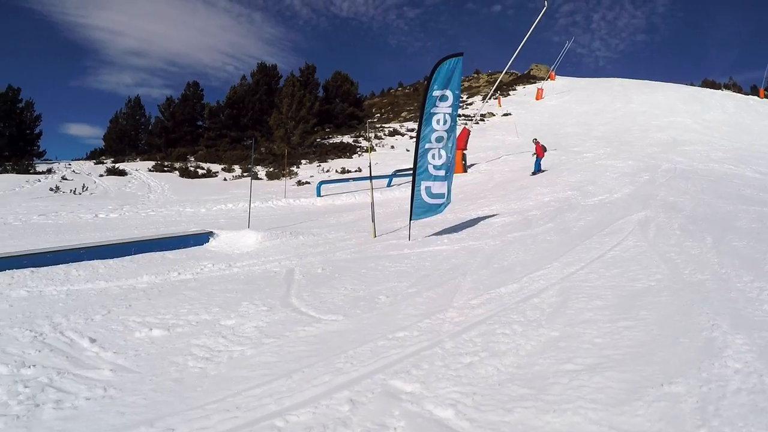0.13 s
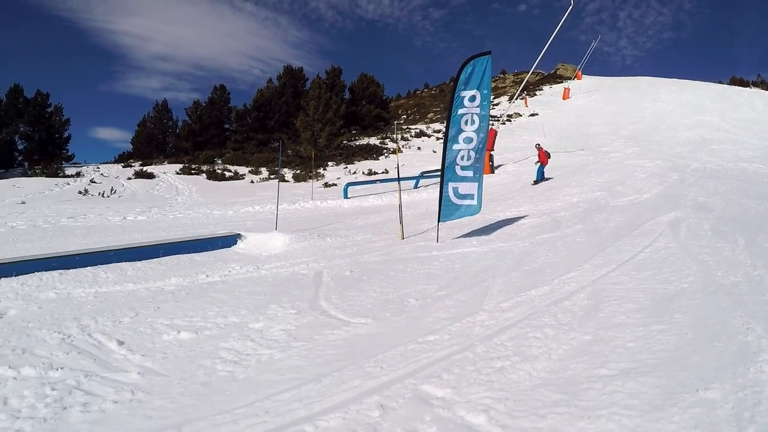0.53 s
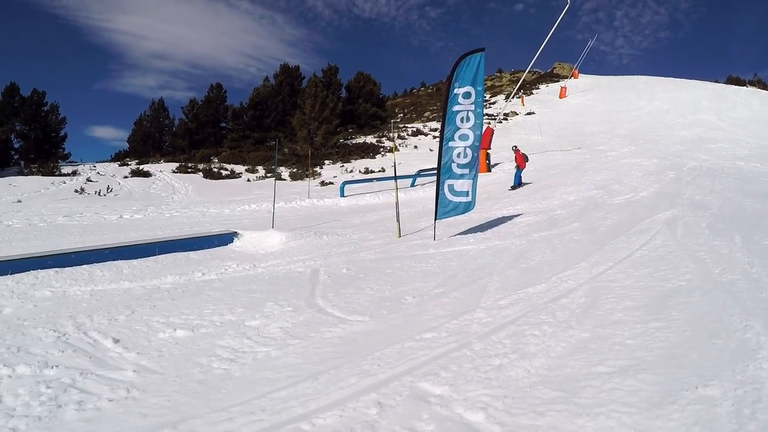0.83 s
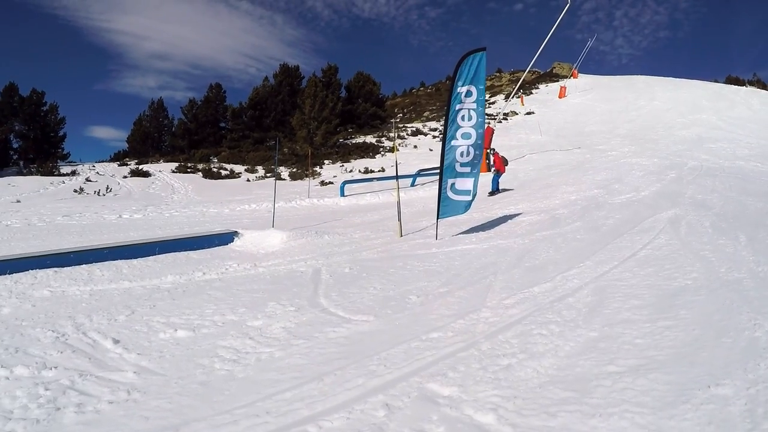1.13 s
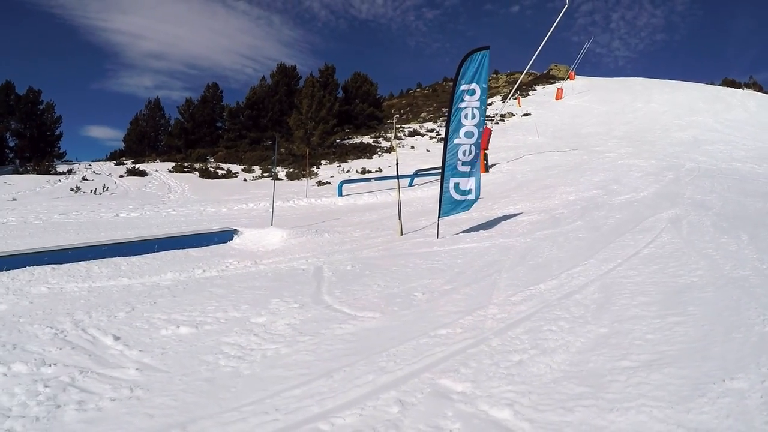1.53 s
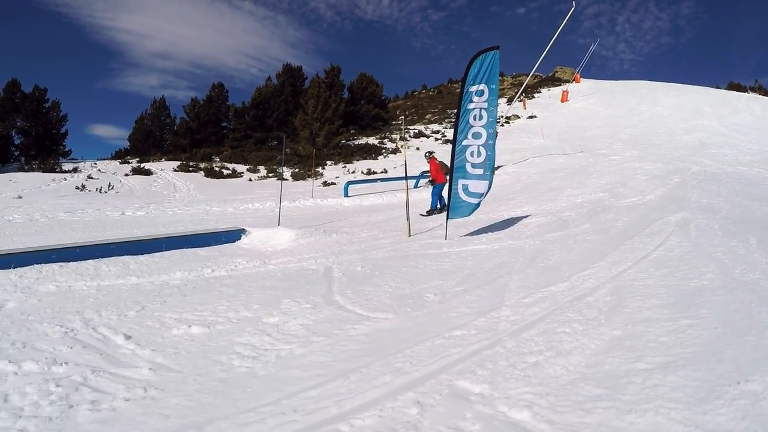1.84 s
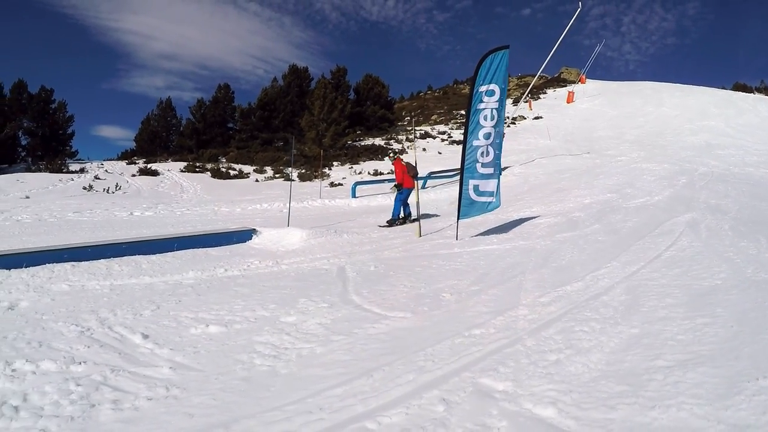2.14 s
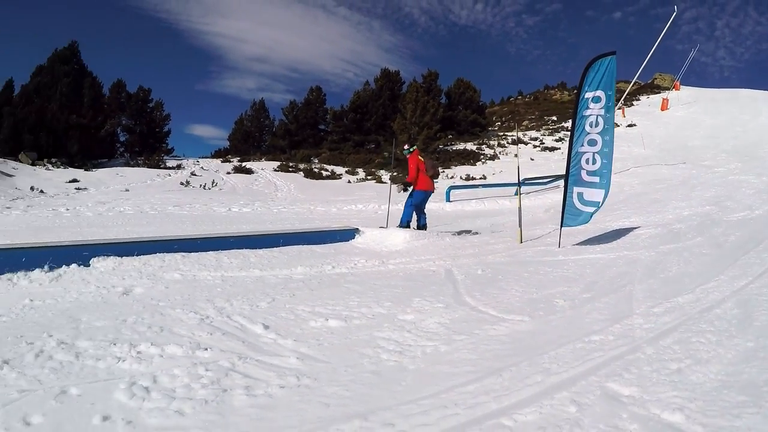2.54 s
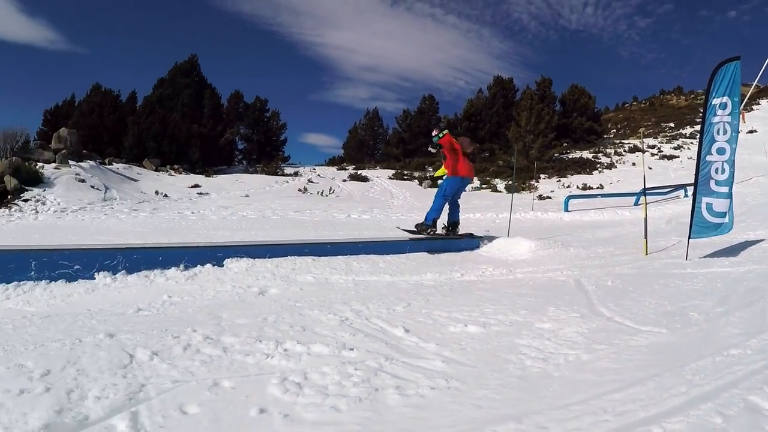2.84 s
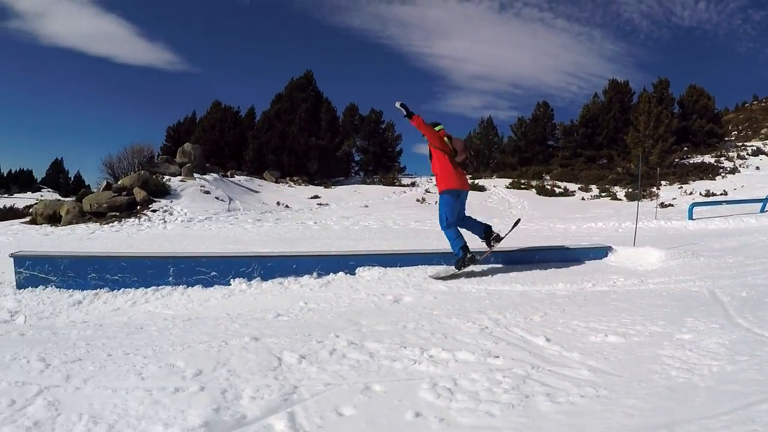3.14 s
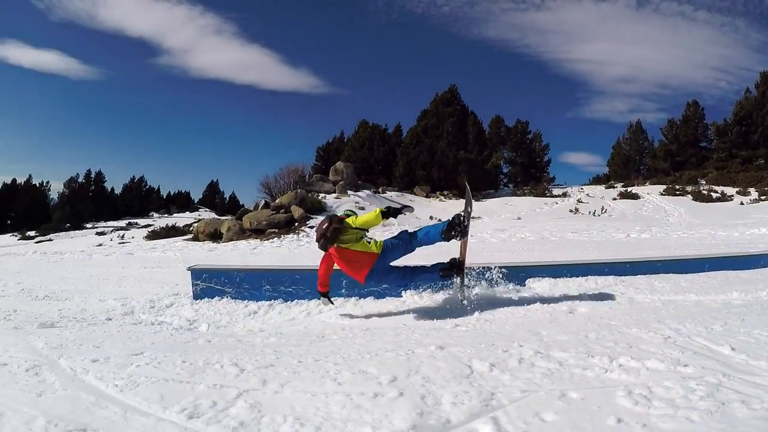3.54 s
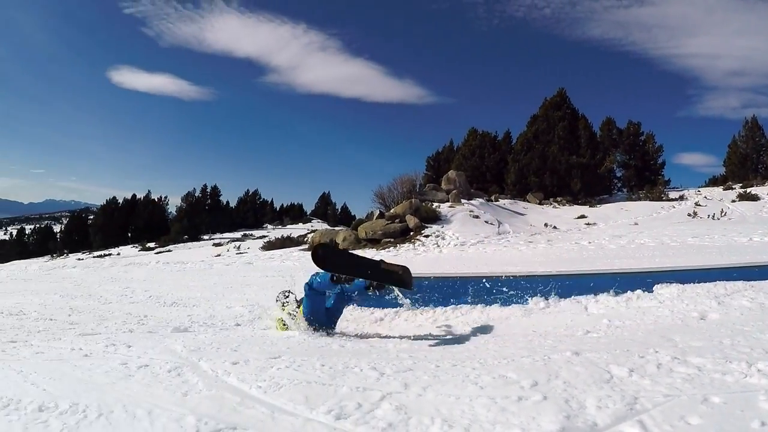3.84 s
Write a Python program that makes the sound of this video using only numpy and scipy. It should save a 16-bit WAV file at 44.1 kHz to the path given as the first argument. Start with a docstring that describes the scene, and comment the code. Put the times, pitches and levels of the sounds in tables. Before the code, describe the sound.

A snowboard glides almost inaudibly under gusty wind rumble, clatters onto a hollow box with one hard slap, scrapes briefly, then skids through snow as the rider thumps down; open slope, wind hitting the microphone.

```python
"""Snowboard on a box in the wind

Wind rumbles and buffets a microphone: slowly modulated bands of noise, and single swings of pressure for the eddies.
A board carves over snow (granular friction noise), strikes a box with a clatter and a hard slap (noise bursts and
decaying modes), and slides along it (friction driving those modes). Its edge then skids through the snow, throws
powder, and the rider falls with dull thumps (noise bursts). Both channels are equal and no walls answer."""
import sys
import numpy as np
from scipy import signal
from scipy.fft import rfft, irfft, next_fast_len
from scipy.io import wavfile
from scipy.ndimage import uniform_filter1d, map_coordinates

SR = 44100
rng = np.random.default_rng(int(sys.argv[2]) if len(sys.argv) > 2 else 0)


def unload_audio(sound):
    """Save the sound as a 16-bit wav file, at the path given as the first command line argument."""
    columns = np.transpose(np.atleast_2d(sound))
    # keep every value between -1 and 1, then stretch to whole-number steps
    steps = np.round(np.clip(columns, -1, 1) * 32767)
    wavfile.write(sys.argv[1], SR, steps.astype(np.int16))


N = 176400

# Levels are before the trims below; spectra are relative, since coloured noise is brought to rms 1.
# Wind strength, from the slow rumble to the fast flutter of gusts: (time [s], level [dB])
RUMBLE_LEVEL = [(0.06, -38), (0.17, -14), (0.2, -21.5), (0.38, -19.5), (0.42, -28), (0.65, -35.5),
                (0.89, -29.5), (1.27, -27.5), (1.49, -15.5), (1.5, -20.5), (1.84, -30.5), (1.87, -12.5),
                (1.94, -28), (1.97, -13), (2.0, -36), (2.02, -19.5), (2.23, -19.5), (2.26, -28),
                (2.5, -14.5), (2.73, -24.5), (2.8, -9.5), (2.88, -34), (2.98, -17), (3.09, -23),
                (3.13, -16), (3.2, -23), (3.27, -13.5), (3.31, -22), (3.57, -19.5), (3.59, -28),
                (3.78, -18.5), (4.0, -26)]
ROAR_LEVEL = [(0.06, -47.5), (0.14, -46), (0.18, -15), (0.27, -38), (0.67, -59), (1.34, -39.5),
              (1.38, -27.5), (1.74, -40.5), (1.96, -23.5), (1.99, -34), (2.08, -26), (2.12, -26),
              (2.16, -23.5), (2.26, -30.5), (2.56, -31), (2.65, -11), (2.67, -17), (2.81, -22),
              (2.87, -29.5), (3.06, -19.5), (3.14, -28.5), (3.25, -25.5), (3.31, -15.5), (3.37, -20),
              (3.41, -16.5), (3.54, -23.5), (3.76, -25.5), (3.78, -18.5), (3.99, -36), (4.0, -28)]
FLUTTER_LEVEL = [(0.06, -41.5), (0.14, -73), (0.18, -25), (0.25, -44), (0.67, -72.5), (1.34, -51.5),
                 (1.38, -33), (1.46, -59), (1.51, -47), (1.53, -51.5), (1.74, -49), (1.88, -41),
                 (2.06, -47), (2.12, -33.5), (2.14, -33), (2.18, -30.5), (2.29, -47.5), (2.39, -35),
                 (2.41, -58), (2.51, -22), (2.53, -37.5), (2.66, -29.5), (2.69, -29), (2.74, -18),
                 (2.76, -29.5), (2.86, -36.5), (2.87, -33.5), (2.97, -35), (3.0, -19), (3.03, -35),
                 (3.08, -32), (3.12, -24), (3.14, -26), (3.15, -32), (3.24, -31.5), (3.35, -24),
                 (3.44, -31.5), (3.56, -30), (3.59, -42), (3.68, -30.5), (3.71, -46.5), (3.78, -25),
                 (3.94, -43), (4.0, -46)]
# Wind and open-air spectra: (frequency [Hz], density [dB per Hz])
RUMBLE_TONE = [(10, -14.5), (22, 2), (38, 2), (65, -1.5), (95, -10), (140, -22), (220, -29.5), (500, -80.5),
               (1000, -120)]
ROAR_TONE = [(40, -25.5), (85, -2), (120, 2), (160, -3), (210, -12), (300, -25.5), (500, -66), (1000, -105)]
FLUTTER_TONE = [(110, -7.5), (190, 1), (260, 1), (340, -3), (450, -12), (700, -27), (1200, -42.5),
                (2500, -94)]
AIR_TONE = [(100, -6.5), (350, -5), (520, 5), (900, -3.5), (1500, -7.5), (3000, -8.5), (4600, -12.5),
            (5600, -13.5), (9000, -21), (15000, -27.5)]
# Board gliding on snow: (time [s], level [dB])
CARVE_LEVEL = [(0.08, -71), (0.27, -65), (0.48, -63), (0.5, -92), (0.63, -81.5), (0.67, -64), (1.1, -84),
               (1.4, -59), (1.71, -64), (1.92, -58), (2.29, -58.5), (2.35, -52), (2.63, -54), (2.67, -49),
               (2.77, -56), (2.8, -81), (2.82, -56), (2.85, -65)]
# Edge biting into the snow in a turn: (time [s], level [dB], rise [s], fall [s])
TURNS = [(.47, -62.5, 0.16, .012), (1.41, -55, 0.092, 0.056)]
# Spectra of glide and turn: (frequency [Hz], density [dB per Hz])
CARVE_TONE = [(300, -22.5), (800, 0.5), (1500, -3.5), (2500, 0), (4000, 0), (5500, -11), (8000, -14.5),
              (11000, -19), (15000, -20)]
TURN_TONE = [(400, -19), (1000, 4.5), (1600, 0), (2300, 5), (3200, -1), (5000, -15), (9000, -46)]
# Eddies that hit the microphone: (time [s], level [dB], frequency [Hz])
EDDIES = [(.173, -15.5, 313), (.185, -10, 195), (0.198, -17, 230), (.361, -24.5, 154), (0.469, -32, 210),
          (1.384, -17, 224), (1.504, -12.5, 158), (1.874, -19, 80), (1.905, -25, 322), (1.947, -24.5, 347),
          (2.085, -14.5, 170), (2.118, -9, 287), (2.122, 0, 116), (2.171, -23.5, 346), (2.498, -17, 510),
          (2.649, -11, 166), (2.661, -19.5, 490), (2.736, -19.5, 298), (2.806, -16, 420), (2.81, -4.5, 55),
          (3.11, -16, 170), (3.1161, -10, 670), (3.119, -2.5, 233), (3.126, -2.5, 134), (3.160, -4, 245),
          (3.193, -15, 224), (3.217, -9.5, 127), (3.271, -10.5, 129), (3.298, -6.5, 152), (3.331, -15, 403),
          (3.343, -6.5, 185), (3.375, -16.5, 510), (3.416, -6, 99), (3.489, -11.5, 122)]
# Board sliding on the box: (time [s], level [dB])
SLIDE_LEVEL = [(2.865, -60), (2.874, -40), (2.905, -41), (2.915, -39), (2.945, -35), (2.985, -43.5),
               (3.01, -33.5), (3.03, -37.5), (3.06, -31.5), (3.095, -40), (3.12, -29.5), (3.145, -64)]
# Spectrum of the sliding friction: (frequency [Hz], density [dB per Hz])
SLIDE_TONE = [(200, 9), (500, 5.5), (1100, -1), (1500, 4), (2200, 2.5), (3300, 5.5), (4300, 0), (5300, -7),
              (7000, -10.5), (8500, -19), (15000, -35)]
# Modes of board and box: (frequency [Hz], level [dB], t60 [s])
RING_MODES = [(627, -17.5, .019), (932, -12, 0.029), (1856, -18.5, 0.03), (2000, -20, 0.033),
              (2170, -13, 0.021), (2420, -28, 0.019), (2643, -8.5, 0.023), (2849, -18, 0.017),
              (3380, 0.5, 0.015), (3770, -5.5, 0.019), (4010, -4.5, 0.017), (4230, -8, 0.021),
              (4590, -16, 0.029), (5550, -9, 0.0082), (5780, -19, 0.015), (6370, -17, 0.015),
              (8160, -24, 0.014), (8600, -21, 0.011), (9350, -22, .012), (10440, -31, 0.014)]
# Modes of the hollow body of the box: (frequency [Hz], level [dB], t60 [s])
BOOM_MODES = [(380, -3.5, 0.14), (445, -7, .06), (537, -6.5, .08), (605, -4, .04), (695, -9.5, .045),
              (810, -8.5, 0.066), (930, -4, 0.039), (1090, -6, 0.059), (1263, 0, 0.027)]
# Board striking the box:
# (time [s], snap [dB], crack [dB], ring [dB], boom [dB], crack t60 [s], rise of the ring [s])
KNOCKS = [(2.868, -32, -22, -26, -21.5, 0.038, 0.000088), (2.8869, -38, -23, -40, -23.5, 0.022, .0004),
          (2.901, -39, -29, -44, -32, .025, 0.00027), (2.9946, -3, -14, -0.5, -27, 0.03, 0.00006),
          (3.12, -34, -28, -12, -30, 0.026, 0.0013)]
# Spectra of snap and crack: (frequency [Hz], density [dB per Hz])
SNAP_TONE = [(500, 0), (1800, 2), (3000, -4), (4200, -2), (5000, -3), (6500, -2), (9000, -13), (12000, -27),
             (14500, -24)]
CRACK_TONE = [(300, -17), (900, -8), (1500, -5), (2500, 5), (3400, 3.5), (4400, -13), (5200, -6),
              (7000, -21), (10000, -24), (12500, -31), (14500, -42)]
# Edge and body ploughing the snow, and the thrown powder: (time [s], level [dB])
SKID_LEVEL = [(3.14, -45), (3.144, -47), (3.354, -39), (3.518, -43), (3.568, -35.5), (3.618, -49.5),
              (3.688, -46), (3.712, -53), (3.762, -46), (3.774, -35.5), (3.788, -40.5), (3.812, -33),
              (3.946, -52.5), (4.0, -42.5)]
POWDER_LEVEL = [(3.14, -56), (3.242, -49.5), (3.3, -52.5), (3.378, -46.5), (3.54, -47.5), (3.61, -63),
                (3.628, -52), (3.74, -58), (3.81, -46), (3.916, -60.5), (3.966, -59.5), (4.0, -47)]
# Spectra of skid and powder: (frequency [Hz], density [dB per Hz])
SKID_TONE = [(200, -7), (600, 2.5), (1200, 1), (2000, -1), (3300, 1), (4400, -2), (5400, -9), (8000, -20.5),
             (15000, -29)]
POWDER_TONE = [(2000, -8), (5000, 5.5), (7000, 5.5), (9000, 3.5), (11500, -4), (14000, -0.5), (16000, -9)]
# Rider thumping into the snow: (time [s], level [dB], t60 [s])
THUMPS = [(3.651, -30, 0.023), (3.683, -30, 0.026), (3.7733, -9, 0.024), (3.793, -22, 0.036),
          (3.812, -15, 0.036), (3.823, -21.5, 0.059), (3.861, -27, 0.038)]
# Spectra of thump, packing snow and icy crust: (frequency [Hz], density [dB per Hz])
THUMP_TONE = [(60, -11), (200, -1), (450, 1), (800, -1), (1400, -10), (3000, -26.5), (6000, -31),
              (12000, -50)]
CRUNCH_TONE = [(150, -6), (350, 0), (700, 2), (1300, -6), (1900, -20), (4000, -28), (9000, -42)]
CRUST_TONE = [(1500, -18), (3000, -8), (4200, 2), (5000, -1), (5900, -1), (7000, -12), (10000, -18),
              (15000, -26)]

# Level trims [dB]; AIR_DB is the whole level of the open-air hiss
AIR_DB, RUMBLE_DB, ROAR_DB, FLUTTER_DB = -58, 0.5, -1, -1
CARVE_DB, SLIDE_DB, SKID_DB, POWDER_DB = 1, -0.5, 1, 1
WHINE_HZ, WHINE_WOBBLE_HZ, WHINE_DB = 5000, 5, -77.5
EDDY_CYCLES = 0.46  # width of an eddy, in periods of its swing
EDDY_SPREAD = 2.54  # frequency of its small partner over its own
SLIDE_RING_DB = -7  # ring in the slide, relative to the bare friction
SNAP_T60_S = 0.0029
# Deepest push into the snow: after the end, so only a vanishing trace of its build-up falls inside
CRUNCH_S = 4.2
CRUNCH_DB, CRUNCH_RISE_S, CRUNCH_FALL_S = -25.5, 0.024, 0.014
CRUST_DB, CRUST_RISE_S, CRUST_FALL_S = -38, 0.035, 0.045
START_S = 0.055  # silence before this
TOP_HZ = 15350  # band limit


def amp(db):
    """Decibel law: 20 dB is a factor of ten in amplitude."""
    return 10 ** (np.asarray(db) / 20)


def unit(x):
    """Normalisation by mean power: x at rms 1."""
    return x / np.sqrt(np.mean(x ** 2) + 1e-20)


def clock():
    """Uniform sampling: the time [s] of every sample."""
    return np.arange(N) / SR


def level(rows, fade_s=0.03):
    """Amplitude envelope: gain linear in dB between points, decaying exponentially outside them."""
    s, db = np.transpose(rows)
    t = clock()
    outside = np.maximum(0, np.maximum(s[0] - t, t - s[-1]))
    return amp(np.interp(t, s, db)) * np.exp(-outside / fade_s)


def swell(s, rise_s, fall_s):
    """Gaussian envelope: a smooth rise to 1 at time s, and a fall."""
    t = clock() - s
    width = np.where(t < 0, rise_s, fall_s)
    return np.exp(-0.5 * (t / width) ** 2)


def wobble(rate):
    """Band-limited random process: a smooth curve through rate random knots a second."""
    knots = rng.standard_normal(int(N * rate / SR) + 4)
    return map_coordinates(knots, [clock() * rate])


def colour(x, tone):
    """Linear filtering in the frequency domain: x shaped by the spectrum, at rms 1."""
    m = next_fast_len(len(x) + 8192)
    hz, db = np.transpose(tone)
    log_hz = np.log(np.fft.rfftfreq(m, 1 / SR) + 1)  # +1 Hz avoids log(0)
    gain = amp(np.interp(log_hz, np.log(hz), db))
    return unit(irfft(rfft(x, m) * gain, m)[:len(x)])


def noise(tone):
    """Filtered white noise: a random sound of the given spectrum, at rms 1."""
    return colour(rng.standard_normal(N), tone)


def turbulence(tone, span_s):
    """Power equalisation: coloured noise divided by its own local strength over about span_s."""
    x = noise(tone)
    size = int(span_s * SR) + 1
    power = uniform_filter1d(uniform_filter1d(x * x, size), size)
    return unit(x / np.sqrt(np.abs(power) + 0.054))  # the floor keeps some unevenness


def grains(tone, rate, grain_db):
    """Granular friction: a hiss with tiny fractures of uneven size, on average rate a second."""
    hiss = rng.standard_normal(N)
    snaps = (rng.random(N) < rate / SR) * rng.standard_normal(N)
    return colour(hiss + amp(grain_db) * unit(snaps), tone)


def burst(tone, t60, attack_s):
    """Impact noise: a quarter second of coloured noise under a quick rise and exponential decay."""
    t = np.arange(SR // 4) / SR
    shape = amp(-60 * t / t60) * (1 - np.exp(-t / attack_s))
    shaped_noise = colour(rng.standard_normal(len(t)), tone) * shape
    return unit(shaped_noise) * np.sqrt(np.mean(shape ** 2))


def add(out, s, x):
    """Superposition: mix x into out at time s."""
    part = out[round(s * SR):][:len(x)]
    part += x[:len(part)]


def wind():
    """Turbulent pressure: rumble, roar and lumpy flutter at the microphone, over faint open-air hiss."""
    rumble_gain = amp(RUMBLE_DB + 1.62 * wobble(18)) * level(RUMBLE_LEVEL)
    rumble = rumble_gain * turbulence(RUMBLE_TONE, span_s=0.063)
    roar_gain = amp(ROAR_DB + 3.1 * wobble(35)) * level(ROAR_LEVEL)
    roar = roar_gain * turbulence(ROAR_TONE, span_s=0.014)
    flutter_gain = amp(FLUTTER_DB + 3.54 * wobble(60)) * level(FLUTTER_LEVEL)
    flutter = flutter_gain * turbulence(FLUTTER_TONE, span_s=0.044)
    air = amp(AIR_DB) * noise(AIR_TONE)
    return rumble + roar + flutter + air


def whine():
    """Phase and amplitude modulation: a thin, faint sine that wavers slightly."""
    gain = amp(WHINE_DB + 1.5 * wobble(WHINE_WOBBLE_HZ))
    phase = 2 * np.pi * WHINE_HZ * clock() + wobble(WHINE_WOBBLE_HZ)
    return gain * unit(np.sin(phase))


def run_up():
    """Sliding friction: the board hisses over packed snow; in each turn its edge scrapes lower."""
    glide_gain = amp(CARVE_DB + 2.1 * wobble(35.06)) * level(CARVE_LEVEL)
    glide = glide_gain * grains(CARVE_TONE, rate=1400, grain_db=-11)
    bite = sum(amp(db) * swell(s, rise_s, fall_s) for s, db, rise_s, fall_s in TURNS)
    return glide + bite * noise(TURN_TONE)


def eddies():
    """Passing vortices: each is a brief swing of pressure with a smaller, faster one riding on it."""
    out = np.zeros(N)
    t = np.arange(SR // 10) / SR - 0.05  # centred on the eddy
    for s, db, hz in EDDIES:
        large_phase, small_phase = rng.uniform(0, 2 * np.pi, 2)
        turn = 2 * np.pi * hz * t
        swing = np.sin(turn + large_phase) + amp(-29) * np.sin(EDDY_SPREAD * turn + small_phase)
        envelope = 1 / np.cosh(np.clip(2 * t * hz / EDDY_CYCLES, -50, 50))
        add(out, s + t[0], amp(db) * swing * envelope)
    return out


def box_ring():
    """Modal decay: board and box ring briefly from rest, with mode levels a little different each time."""
    t = np.arange(SR // 4) / SR
    ring = np.zeros(len(t))
    for hz, db, t60 in RING_MODES:
        decay = amp(db + rng.normal(0, 0.39) - 60 * t / t60)
        ring += decay * np.sin(2 * np.pi * hz * t)
    return ring


def box_slide():
    """Friction-driven resonance: the base chatters along the box and keeps its modes ringing."""
    rub = grains(SLIDE_TONE, rate=580, grain_db=-5.5)
    ring = unit(signal.fftconvolve(rng.standard_normal(N), box_ring())[:N])
    gain = amp(SLIDE_DB + 2.2 * wobble(130)) * level(SLIDE_LEVEL)
    return gain * unit(rub + amp(SLIDE_RING_DB) * ring)


def box_boom():
    """Hollow-body resonance: low decaying modes answer a blow, in a new mix and phase each time."""
    t = np.arange(SR // 2) / SR
    boom = np.zeros(len(t))
    for hz, db, t60 in BOOM_MODES:
        decay = amp(db + rng.normal(0, 1.9) - 60 * t / t60)
        boom += decay * np.sin(2 * np.pi * (hz * t + rng.random()))
    return boom * (1 - np.exp(-t / 0.00041))


def box_knocks():
    """Impact excitation: snap, crack, short ring and hollow boom; glancing blows ring up more slowly."""
    out = np.zeros(N)
    t = np.arange(SR // 4) / SR
    for s, snap_db, crack_db, ring_db, boom_db, crack_t60, rise_s in KNOCKS:
        add(out, s, amp(snap_db) * burst(SNAP_TONE, SNAP_T60_S, attack_s=0.00008))
        add(out, s, amp(crack_db) * burst(CRACK_TONE, crack_t60, attack_s=0.00041))
        add(out, s, amp(ring_db) * box_ring() * (1 - np.exp(-t / rise_s)))
        add(out, s, amp(boom_db) * box_boom())
    return out


def skid():
    """Ploughing friction: the edge breaks through the snow in a grainy hiss of uneven strength."""
    gain = amp(SKID_DB + 1.47 * wobble(90)) * level(SKID_LEVEL)
    return gain * grains(SKID_TONE, rate=1200, grain_db=-3.5)


def powder():
    """Granular noise: thrown powder is a bright, dense, grainy hiss."""
    return amp(POWDER_DB) * level(POWDER_LEVEL) * grains(POWDER_TONE, rate=2700, grain_db=-6)


def thumps():
    """Damped soft impact: the rider's blows on the snow are dull noise bursts."""
    out = np.zeros(N)
    for s, db, t60 in THUMPS:
        add(out, s, amp(db) * burst(THUMP_TONE, t60, attack_s=0.0011))
    return out


def snow_crunch():
    """Compaction fracture: grains of snow packing under weight, and icy crust around the same push."""
    packing = swell(CRUNCH_S, CRUNCH_RISE_S, CRUNCH_FALL_S) * grains(CRUNCH_TONE, rate=500, grain_db=5)
    crust = swell(CRUNCH_S, CRUST_RISE_S, CRUST_FALL_S) * grains(CRUST_TONE, rate=600, grain_db=2)
    return amp(CRUNCH_DB) * packing + amp(CRUST_DB) * crust


def scene():
    """Superposition of all sources, equal in both channels."""
    mono = wind() + eddies() + whine() + run_up() + box_knocks() + box_slide()
    mono += skid() + powder() + snow_crunch() + thumps()
    return np.array([mono, mono])


def record(dry):
    """Saturation and band limiting: a short fade-in, smoothly rounded peaks, then a steep low-pass."""
    x = dry * np.clip((clock() - START_S) / 0.004, 0, 1)
    x = x / (1 + np.abs(x / 0.86) ** 5) ** (1 / 5)  # approaches 0.86 at most
    low_pass = signal.ellip(10, 0.05, 60, TOP_HZ, fs=SR, output="sos")
    return signal.sosfiltfilt(low_pass, x)


dry = scene()
out = record(dry)
unload_audio(out)
```